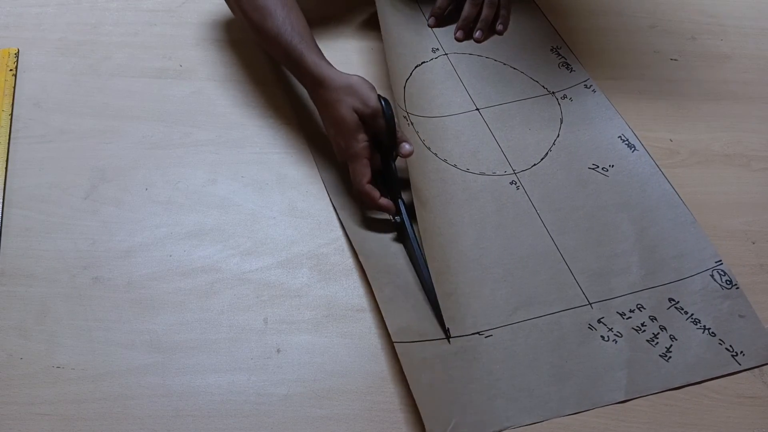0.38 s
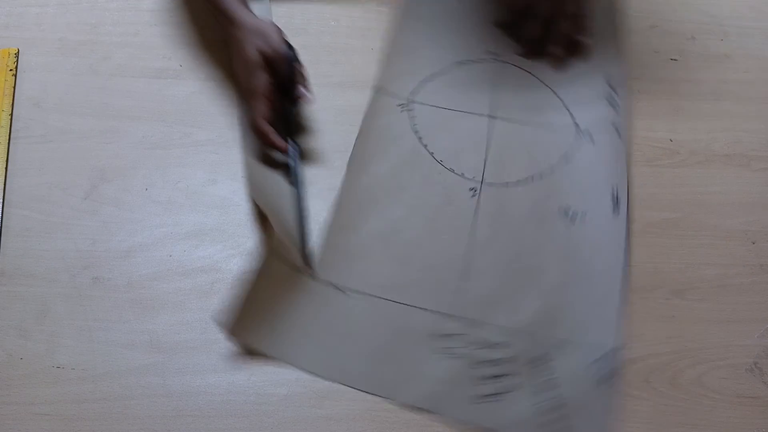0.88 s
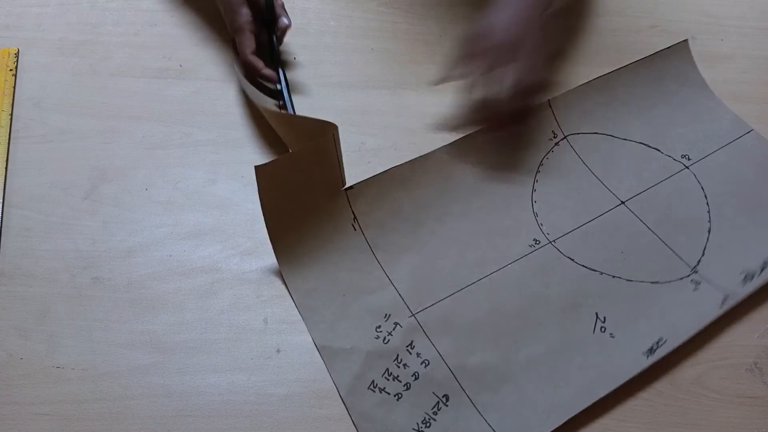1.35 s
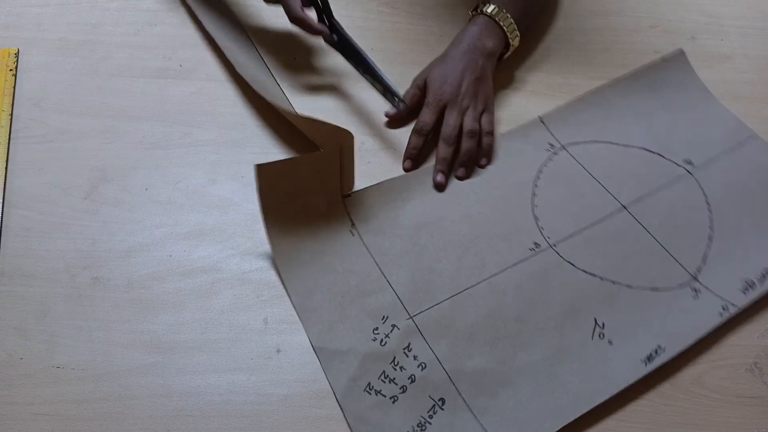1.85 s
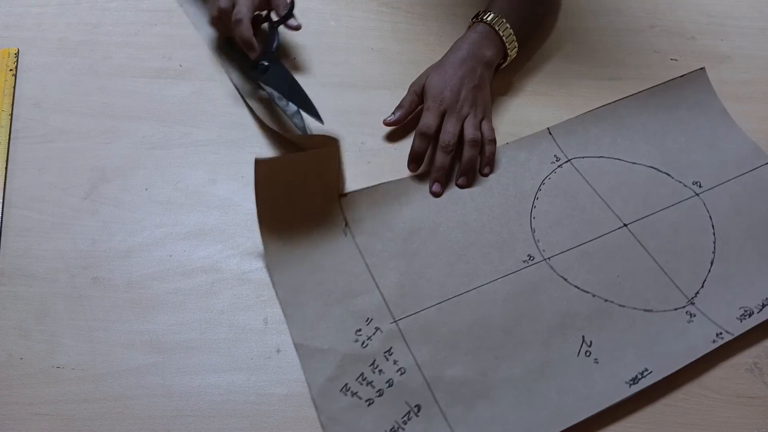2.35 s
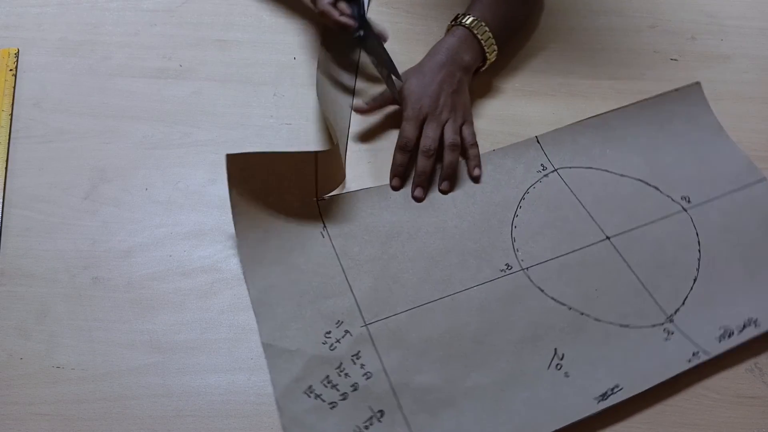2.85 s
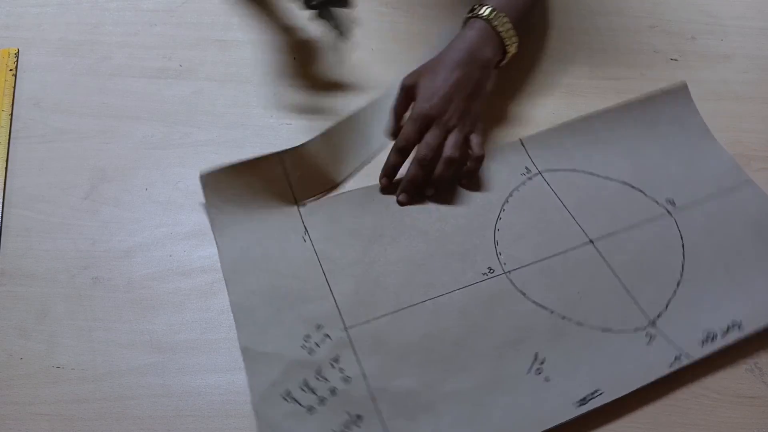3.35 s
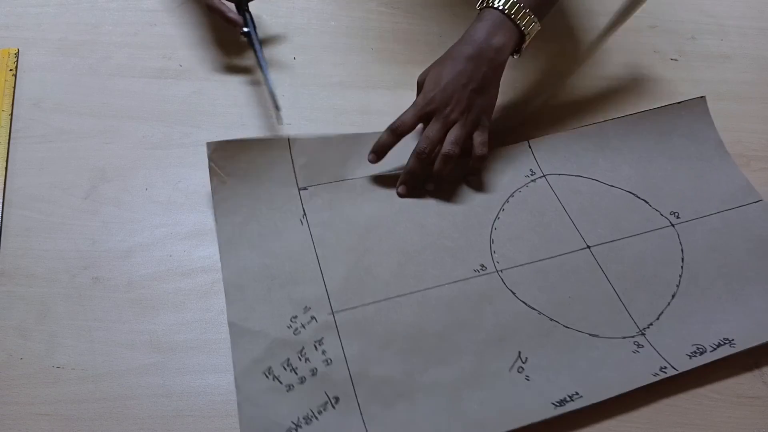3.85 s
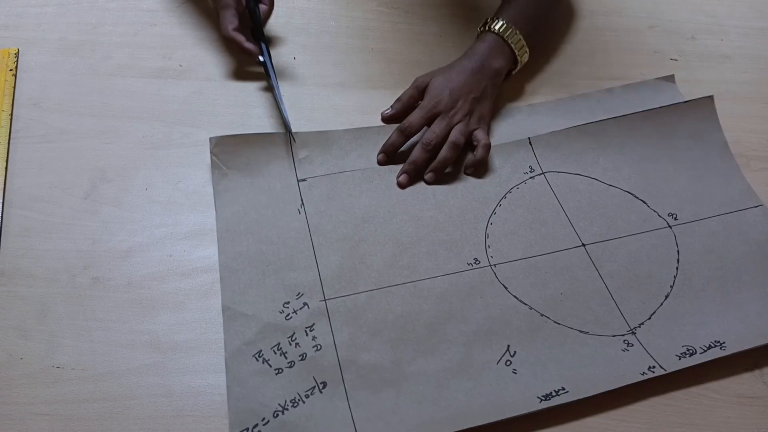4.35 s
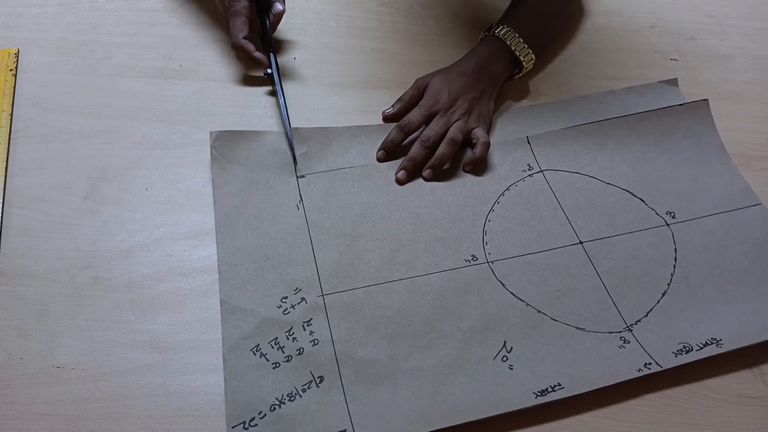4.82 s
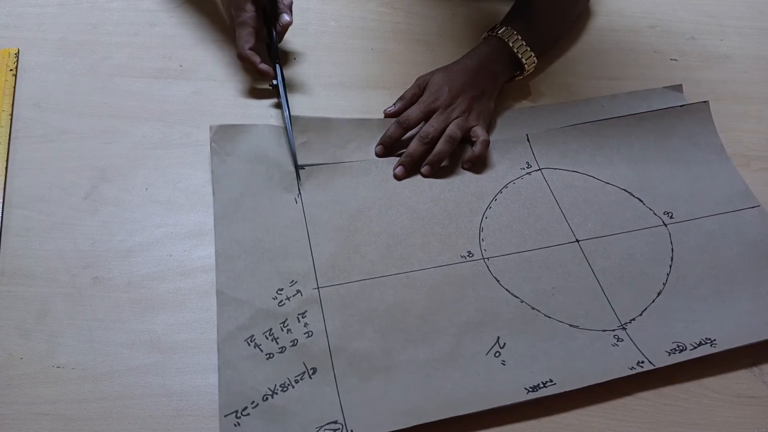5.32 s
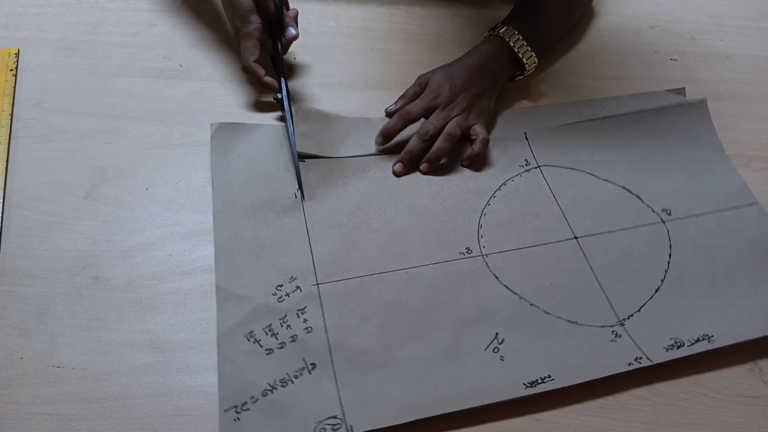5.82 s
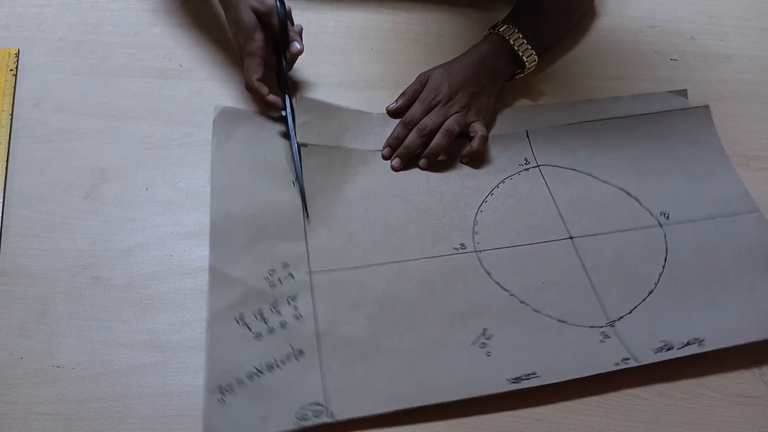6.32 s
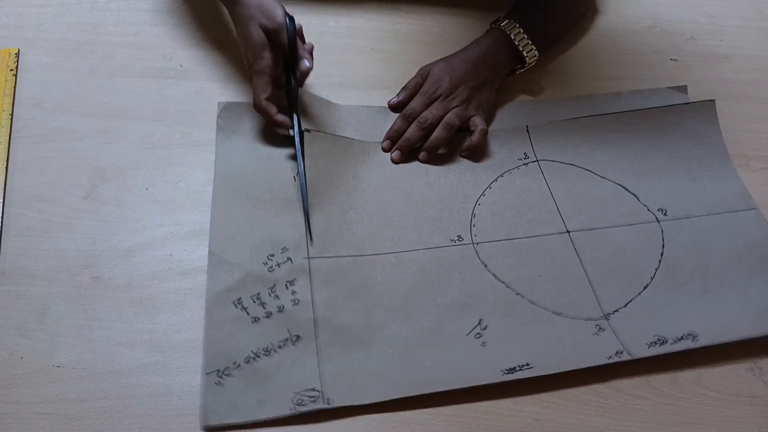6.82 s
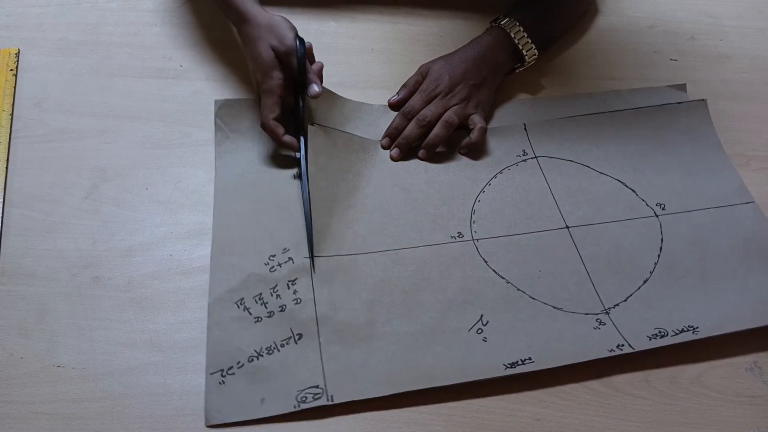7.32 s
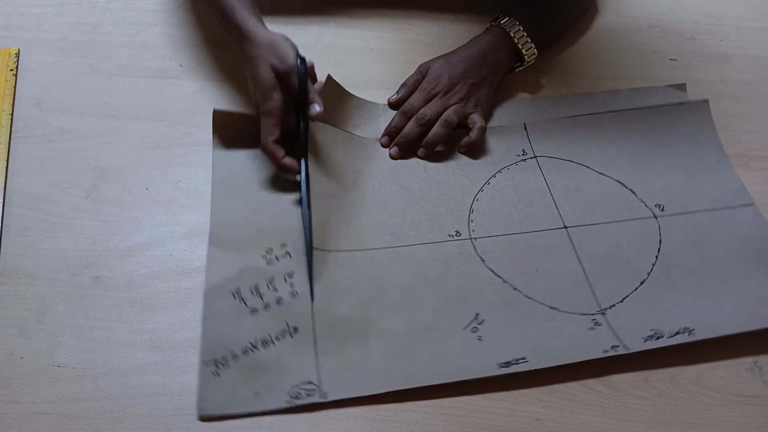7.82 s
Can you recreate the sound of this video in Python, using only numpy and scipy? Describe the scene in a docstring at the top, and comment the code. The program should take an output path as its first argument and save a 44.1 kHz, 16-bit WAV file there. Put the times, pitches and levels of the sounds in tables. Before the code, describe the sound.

Close scissor cuts in heavy paper on a wooden table, with steel snicks, a rising sheet scrape, faint rustling and a single loud knock.

```python
"""Long scissors crunch twice through a big sheet of stiff paper on a wooden table, close by in a small room.
Steel snicks, the sheet is dragged round with a climbing drone, then rustles; a hard knock with a quick bounce
hits the table, and eight more cuts follow. Shear, scraping and rustling are irregular fibre slips filtered by
resonances of blades, table and sheet; the knock is decaying table modes over a crack; faint air lies below."""
import sys
import numpy as np
from scipy import signal
from scipy.fft import rfft, irfft, next_fast_len
from scipy.io import wavfile
from scipy.ndimage import uniform_filter1d, map_coordinates

SR = 44100
rng = np.random.default_rng(int(sys.argv[2]) if len(sys.argv) > 2 else 0)


def materialize(psi):
    """Save the field psi as 16-bit PCM at rate SR to the path in sys.argv[1].

    A 1-D psi becomes a single channel; in a 2-D psi each row is a channel.
    """
    bounded = np.clip(np.atleast_2d(psi).T, -1, 1)
    quanta = np.round(bounded * 32767).astype(np.int16)
    wavfile.write(sys.argv[1], SR, quanta)


def invert_db(x):
    """Field ratio 10**(x/20) for x, a level in decibels (scalar or array-like)."""
    u = np.asarray(x, float) / 20
    return 10 ** u


N = 349660  # length in samples


def unit(x):
    """Normalization: scales a signal to rms 1."""
    return x / np.sqrt(np.mean(np.abs(x) ** 2) + 1e-20)


def along(points, hz):
    """Logarithmic frequency scale: interpolates (frequency, value) points."""
    point_hz, value = np.transpose(points)
    return np.interp(np.log(hz + 1), np.log(point_hz + 1), value)


def curves(rows):
    """Piecewise linear control: a gate open from first to last row, and a curve for each column after time."""
    start, *columns = np.transpose(rows)
    t = np.arange(N) / SR
    is_open = 1.0 * (t >= start[0]) * (t <= start[-1])
    return uniform_filter1d(is_open, size=400), [np.interp(t, start, column) for column in columns]


def filtered(x, response):
    """Linear filtering: multiplies the spectrum by a complex response of frequency."""
    size = next_fast_len(N + SR // 2)
    spectrum = rfft(x, size) * response(np.fft.rfftfreq(size, 1 / SR))
    return irfft(spectrum, size)[..., :x.shape[-1]]


def modes(table):
    """Modal superposition: cubed resonances, steep-sided with dark valleys between them."""
    def response(f):
        return sum(invert_db(db) * (2j * f * width / (centre ** 2 - f ** 2 + 2j * f * width)) ** 3
                   for centre, width, db in table)
    return response


def fibres(spiky_db, lump_db, lump_hz):
    """Stick-slip noise: dense tiny slips of very unequal size, arriving in lumps."""
    sizes = invert_db(spiky_db * rng.exponential(size=N))
    lumps = map_coordinates(rng.standard_normal(2000), [np.arange(N) * lump_hz / SR])
    return rng.standard_normal(N) * sizes * invert_db(lump_db * lumps)


def coloured(x, spectrum):
    """Spectral shaping: applies a gain curve, then scales to rms 1."""
    return unit(filtered(x, lambda hz: invert_db(along(spectrum, hz))))


def resonated(slips, table):
    """Forced vibration: slips drive a set of modes, scaled to rms 1."""
    return unit(filtered(slips, modes(table)))


def gliding(slips, table, hz, reach_hz):
    """Selective excitation: of the fixed modes, those nearest the pitch curve ring the most."""
    near = np.array([np.exp(-((hz - centre) / reach_hz) ** 2) + 1e-3 for centre, _, _ in table])
    rung = np.array([invert_db(db) * resonated(slips, [(centre, width, 0)]) for centre, width, db in table])
    return np.sum(near * rung, axis=0) / np.sqrt(np.sum(near ** 2, axis=0))


def patchy(x, depth_db):
    """Patchy noise: random gain in time-frequency patches."""
    z = signal.stft(x, nperseg=512)[2]
    patches = uniform_filter1d(rng.standard_normal(z.shape), size=2, axis=0)  # bins
    patches = uniform_filter1d(patches, size=14, axis=1)  # frames
    return signal.istft(z * invert_db(depth_db * unit(patches)), nperseg=512)[1][:N]


def swells(start, length, db, swell_db, rise_s, fall_db_per_s):
    """Energy envelope in dB: events rise, drift by swell_db over their length, then fall; powers add."""
    t, power = np.arange(N) / SR, np.full(N, 1e-12)
    for begin, lasts, level_db, drift_db in np.broadcast(start, length, db, swell_db):
        span = slice(round(begin * SR), round((begin + lasts) * SR) + SR // 2)
        age = t[span] - begin
        level = level_db + drift_db * np.clip(age / lasts, 0, 1)
        level = level - fall_db_per_s * np.clip(age - lasts, 0, None)
        power[span] += (invert_db(level) * np.clip(age / rise_s, 0, 1)) ** 2
    return 10 * np.log10(power)


def latest(start, values):
    """Sample and hold: the value of the event that began last."""
    return values[np.clip(np.searchsorted(start, np.arange(N) / SR) - 1, 0, None)]


def power_sum(a_db, b_db):
    """Incoherent addition: two levels in dB, added as powers."""
    return 10 * np.log10(invert_db(a_db) ** 2 + invert_db(b_db) ** 2)


# The blades close and cut: start_s, length_s, shear_db (before a small trim), table_hum_db, swell_db (over the length)
CLOSING_STROKES = [(0.018, 0.094, -36, -37, -4.5), (0.321, 0.053, -37, -36, -3),
                   (4.915, 0.14, -61.5, -44, 14), (5.434, 0.12, -52, -37, 3.5),
                   (5.867, 0.09, -52, -34, 4.5), (6.314, 0.055, -42.5, -34, 1),
                   (6.69, 0.091, -41, -34.5, 1.5), (7.084, 0.072, -39, -37, 1),
                   (7.442, .1, -39, -35.5, -3.5), (7.8, 0.086, -41.5, -35, -1.5)]
# Quieter scraping between and after the closings: reopening blades and fading stroke tails:
# start_s, length_s, shear_db (before the trim), table_hum_db, swell_db (hum sags more)
BETWEEN_STROKES = [(0, 0.03, -30, -32, -13), (0.136, 0.18, -49.5, -43.5, -4.5),
                   (0.394, 0.11, -43.5, -31, -20.5), (5.135, 0.22, -56, -39.5, -9),
                   (5.612, 0.15, -60, -45, 2.5), (5.777, 0.11, -74.5, -95, 4), (5.961, 0.2, -52, -37, -2.5),
                   (6.164, 0.14, -53, -44.5, -5.5), (6.448, 0.3, -46, -39, -16),
                   (6.839, .24, -51.5, -44.5, -1.7), (7.201, 0.32, -48.5, -44, -12),
                   (7.563, 0.15, -41, -38.5, -16.5), (7.71, 0.13, -61.5, -61.5, 23)]
# The cut edge flexes: start_s, length_s, level_db
EDGE_FLEXES = [(0.026, 0.15, -37.5), (0.195, 0.22, -44.5), (0.354, 0.089, -32.5), (4.995, 0.1, -59),
               (5.14, .1, -53), (5.512, 0.094, -47), (5.625, 0.097, -55), (5.984, 0.088, -52),
               (6.344, 0.052, -57), (6.44, 0.24, -53), (6.712, 0.11, -46), (6.803, 0.42, -52.5),
               (7.1, 0.11, -45), (7.434, 0.25, -44.5), (7.799, 0.09, -44.5)]
# The lowest table modes are jolted, by the blade or the dragged sheet: start_s, length_s, level_db
TABLE_JOLTS = [(0.031, 0.025, -38), (0.088, 0.12, -46), (0.345, 0.098, -43), (1.701, 0.033, -56),
               (4.975, 0.024, -41), (5.053, 0.18, -47), (5.522, 0.073, -43), (5.961, .14, -48.5),
               (6.38, 0.04, -44.5), (6.778, 0.018, -52), (7.162, 0.044, -52.5), (7.498, 0.058, -45.5),
               (7.857, .04, -61)]
# Spectrum of sheared fibres: frequency_hz, relative_db
SHEAR_SPECTRUM = [(440, -14), (750, -38.5), (820, 6), (991, 3), (1280, -10.5), (1620, 2), (2560, -1.5),
                  (4830, 0.5), (7620, -13.5), (11600, -11.5), (15500, -25)]
# Blade modes rung by the shear: frequency_hz, width_hz, relative_db
BLADE_MODES = [(775, 150, 2.5), (1165, 194, 3.5), (1277, 78, 8), (1360, 237, 4.5)]
# Table-top modes under blade or sheet: frequency_hz, width_hz, relative_db
TABLE_HUM_MODES = [(520, 23.6, 2.5), (594.5, 33.2, 3.5), (589.6, 74, -3)]
# Sheet modes: frequency_hz, width_hz, relative_db
FLAP_MODES = [(322, 49, -15), (410, 82, -3.5), (715, 99, -10.5)]
# Lowest table modes: frequency_hz, width_hz, relative_db
TABLE_BOOM_MODES = [(126.3, 31.4, 7.5), (175.7, 28, -3)]


def scissors():
    """Friction-driven resonance: fibres part, and the same rough contact shakes blades, table and sheet."""
    start, length, cut_db, ride_db, swell_db = np.transpose(CLOSING_STROKES)
    close_cut_db = swells(start, length, cut_db, swell_db, rise_s=0.0095, fall_db_per_s=229)
    lead_s = 0.0085  # the blade slides on the table just before it bites
    close_ride_db = swells(start - lead_s, length + lead_s, ride_db, swell_db, rise_s=0.024, fall_db_per_s=229)

    start, length, cut_db, ride_db, swell_db = np.transpose(BETWEEN_STROKES)
    between_cut_db = swells(start, length, cut_db, swell_db, rise_s=0.04, fall_db_per_s=592)
    # here the hum sags by a further 9 dB over each event
    between_ride_db = swells(start, length, ride_db, swell_db - 9, rise_s=0.04, fall_db_per_s=592)

    shear_db = power_sum(close_cut_db, between_cut_db)
    hum_db = power_sum(close_ride_db, between_ride_db)
    flap_db = swells(*np.transpose(EDGE_FLEXES), swell_db=-3.5, rise_s=0.025, fall_db_per_s=344)
    boom_db = swells(*np.transpose(TABLE_JOLTS), swell_db=0.5, rise_s=0.018, fall_db_per_s=504)
    # the blades ring when both the cut and the table contact are strong
    blade_db = 0.44 * shear_db + 0.86 * hum_db + 3.66

    slips = fibres(spiky_db=2.5, lump_db=0.5, lump_hz=71.6)
    shear = invert_db(shear_db + 0.75) * coloured(patchy(slips, depth_db=2.8), SHEAR_SPECTRUM)
    blades = invert_db(blade_db) * resonated(slips, BLADE_MODES)
    hum = invert_db(hum_db) * resonated(slips, TABLE_HUM_MODES)
    flap = invert_db(flap_db) * resonated(slips, FLAP_MODES)
    boom = invert_db(boom_db) * resonated(slips, TABLE_BOOM_MODES)
    return shear + blades + hum + flap + boom


# Blades meet at the pivot: start_s, level_db, rise_s (time constant), t60_s, tilt_db_per_octave (about 4400 Hz)
PIVOT_SNICKS = [(.172, -34, .0006, .035, -20), (.347, -31, .0006, .03, 3), (.572, -43, .0027, .12, 14),
                (.6265, -24, .0005, .042, -4), (.678, -40, .001, .02, -22)]
# Steel modes: frequency_hz, width_hz, relative_db (before the tilt)
STEEL_MODES = [(2480, 780, -28), (4200, 97, -1), (5120, 320, -8), (5800, 93, -5.5)]


def snicks():
    """Impact excitation of steel: noise through blade modes rattles briefly and decays exponentially."""
    out, t = np.zeros(N + SR), np.arange(SR // 4) / SR
    for start, db, rise, t60, tilt in PIVOT_SNICKS:
        steel = modes([(hz, width, level + tilt * np.log2(hz / 4400)) for hz, width, level in STEEL_MODES])
        noise = rng.standard_normal(len(t))
        # a weak broadband floor lies between the modes
        rattle = unit(filtered(noise, lambda f: steel(f) + 0.056 / (1 + (f / 8000) ** 2)))
        envelope = invert_db(db - 60 * t / t60) * (1 - np.exp(-t / rise))
        out[round(start * SR):][:len(t)] += envelope * rattle
    return out[:N]


# Blow and bounce: start_s, level_db (before the mix of ring and crack)
KNOCK_BLOWS = [(4.292, -10.5), (4.319, -23)]
# Modes of the struck table: frequency_hz, relative_db (before random scatter), t60_s
STRUCK_TABLE_MODES = [(121.6, 2, 0.47), (189, 3, 0.42), (303.5, -1.5, 0.33), (358, -5.5, 0.45),
                      (494, -12, .4), (644, -1.5, 0.079), (813, -1.5, .2), (1131, -10, 0.42),
                      (1272, -6, 0.43), (1410, -7.5, 0.35), (1626, -13.5, 0.4), (1740, -13.5, 0.35),
                      (1820, -8.5, .36), (1993, -15.5, 0.16), (2280, -26.5, .4), (2760, -11.5, .3)]
# Spectrum of the crack: frequency_hz, relative_db
CRACK_SPECTRUM = [(80, -39.5), (126, 6.5), (300, -14), (640, -1), (960, -21.5), (1450, -3.5), (2700, -25),
                  (6000, -28.5), (8300, -53), (11500, -31), (15500, -66.5)]
# Decay of the room: frequency_hz, t60_s
ROOM_DECAY = [(100, 0.37), (500, 0.43), (900, 0.18), (1500, 0.46), (4000, 0.33), (12000, 0.5)]


def knock():
    """Modal decay under impact: the table's modes ring over a crack that dies band by band in the room."""
    out, t = np.zeros(N + SR), np.arange(SR) / SR
    mode_width_hz = 13

    def wander():
        """Phase diffusion: a random walk broadens each mode, as close modes beating do."""
        return np.cumsum(rng.standard_normal(SR)) * np.sqrt(2 * np.pi * mode_width_hz / SR)

    for start, db in KNOCK_BLOWS:
        ring = sum(invert_db(level + rng.normal(0, 0.88) - 60 * t / t60) * np.sin(2 * np.pi * hz * t + wander())
                   for hz, level, t60 in STRUCK_TABLE_MODES)
        hz, frame_s, z = signal.stft(rng.standard_normal(SR), SR, nperseg=1024)
        shape_db = along(CRACK_SPECTRUM, hz)[:, None] - 60 * frame_s / along(ROOM_DECAY, hz)[:, None]
        shape_db = shape_db + rng.normal(0, 4, (len(hz), 1))  # dense uneven modes
        tail = signal.istft(z * invert_db(shape_db), SR, nperseg=1024)[1][:SR]
        tail = tail / np.std(tail[:900])
        # the room tail, with an extra burst that dies within milliseconds
        crack = tail * (invert_db(-9.5) + invert_db(-4.0 - 60 * t / 0.025))
        onset = 1 - np.exp(-t / 0.0036)
        out[round(start * SR):][:SR] += invert_db(db) * (invert_db(-12.0) * ring + crack) * onset
    return out[:N]


# The sheet is dragged round: time_s, scrape_db (before a trim), table_hum_db, sheet_drone_db (before mode weighting)
DRAG_LEVELS = [(0.57, -79, -69, -78), (0.622, -46, -40.5, -32.5), (0.72, -53.5, -54.5, -40),
               (0.9, -46, -40.5, -40), (1.19, -41, -41, -39), (1.506, -58.5, -39, -47.5),
               (1.654, -71.5, -58, -81), (1.716, -62.5, -50, -60), (1.826, -84.5, -85, -88)]
# Climb of the drone: time_s, pitch_hz
DRONE_PITCH = [(.9, 209), (1.5, 395)]
# Spectrum of the scrape: frequency_hz, relative_db
SCRAPE_SPECTRUM = [(410, -61), (700, 4), (1070, -3), (1120, -7), (1650, -2), (1920, -5.5), (5290, -5.5),
                   (8210, -19), (11100, -11.5), (15500, -23.5)]
# Table top under the sliding sheet: frequency_hz, width_hz, relative_db
OVERTONE_MODE = [(1140, 50, 0)]
# Modes of the sheet on the table: frequency_hz, width_hz, relative_db
DRONE_MODES = [(201, 45.6, 5.5), (289, 55, 3.5), (370.7, 48, 3.5)]


def drag():
    """Sliding friction: the sheet scrapes over wood; its drone climbs mode by mode as less hangs free."""
    gate, (scrape_db, hum_db, drone_db) = curves(DRAG_LEVELS)
    _, (drone_hz,) = curves(DRONE_PITCH)
    # the boom dies once the drone has climbed above 272 Hz, at 0.4 dB per Hz
    boom_db = drone_db - 1.5 - 0.4 * np.clip(drone_hz - 272, 0, None)
    slips = fibres(spiky_db=1.5, lump_db=1.0, lump_hz=59.57)
    scrape = invert_db(scrape_db + 3.5) * coloured(slips, SCRAPE_SPECTRUM)
    hum = invert_db(hum_db) * resonated(slips, TABLE_HUM_MODES)
    overtone = invert_db(hum_db - 22) * resonated(slips, OVERTONE_MODE)
    boom = invert_db(boom_db) * resonated(slips, TABLE_BOOM_MODES)
    drone = invert_db(drone_db) * gliding(slips, DRONE_MODES, drone_hz, reach_hz=89.3)
    return gate * (scrape + hum + overtone + boom + drone)


# The loose flap rustles: start_s, length_s, rustle_db, high_hiss_db, crinkle (0 even rasp to 1 patchy, clipped)
FLAP_RUSTLES = [(1.772, 0.12, -68, -76, 0.59), (1.886, 0.12, -63.5, -69, .95),
                (2.033, 0.13, -65.5, -67, .95), (2.286, 0.22, -75.5, -72, 0.38),
                (2.512, 0.039, -55, -63, 0.97), (2.581, 0.17, -63, -72, 0.77),
                (2.708, 0.18, -53, -62, 0.056), (2.893, .065, -70.5, -86, .1),
                (3.003, 0.11, -81.5, -82, .5), (3.117, 0.12, -70, -71, 1.2), (3.249, 0.014, -55, -60, 0.42),
                (3.305, 0.37, -70.5, -79.5, 0.25), (3.614, 0.057, -65.5, -84.5, 0.079),
                (3.78, 0.05, -58, -62.5, 1.17), (3.877, 0.15, -66.5, -75, 0.65), (4.065, 0.3, -81, -82, .8),
                (4.56, 0.032, -62.5, -67, 0.29), (4.656, 0.038, -88, -65.5, 0.68),
                (4.835, 0.025, -95, -68.5, 0.64)]
# The stiff flap rings as it scrapes: start_s, length_s, level_db (before mode weighting), pitch_hz
FLAP_RINGS = [(1.787, 0.02, -58.5, 520), (2.717, 0.19, -55, 673), (2.843, 0.041, -43, 610),
              (2.906, 0.045, -62, 520), (3.27, .01, -73, 680), (3.609, 0.036, -62, 835),
              (3.894, 0.037, -81, 800), (4.09, 0.0064, -61, 626), (4.702, 0.13, -74.5, 510)]
# Spectrum of rustling paper: frequency_hz, relative_db
RUSTLE_SPECTRUM = [(590, -42), (1000, -8.5), (1380, -6.5), (1480, -5.5), (4490, -4), (6120, -4.5),
                   (8340, -24.5), (11500, -12), (15500, -33.5)]
# Modes of the stiff flap: frequency_hz, width_hz, relative_db
RING_MODES = [(511.4, 37, 0.5), (608, 36, -1.5), (809, 59, 10.5)]


def handling():
    """Crumpling and sliding noise: patchy crinkle or even rasp, a high hiss, and the stiff flap's resonance."""
    start, length, body_db, top_db, crinkle = np.transpose(FLAP_RUSTLES)
    evenness = 1 - np.clip(latest(start, crinkle), 0, 1)
    rustle_db = swells(start, length, body_db, swell_db=-1.5, rise_s=0.023, fall_db_per_s=351)
    hiss_db = swells(start, length, top_db, swell_db=-1.5, rise_s=0.023, fall_db_per_s=351)
    start, length, db, hz = np.transpose(FLAP_RINGS)
    ring_db = swells(start, length, db, swell_db=-1.5, rise_s=0.0021, fall_db_per_s=398.5)
    ring_hz = latest(start, hz)

    slips = fibres(spiky_db=2.5, lump_db=0.8, lump_hz=40.7)
    crinkled = patchy(fibres(spiky_db=2.5, lump_db=1.2, lump_hz=40), depth_db=6.5)
    # the patchy rustle is thin and bright, without low tones
    crinkled = filtered(crinkled, lambda hz: 1 / (1 + (2300 / (hz + 1)) ** 4))
    paper = np.sqrt(evenness) * unit(slips) + np.sqrt(1 - evenness) * unit(crinkled)
    body = filtered(paper, lambda hz: invert_db(along(RUSTLE_SPECTRUM, hz)) * (hz < 7500))
    top = filtered(paper, lambda hz: invert_db(along(RUSTLE_SPECTRUM, hz)) * (hz >= 7500))
    ring = invert_db(ring_db) * gliding(slips, RING_MODES, ring_hz, reach_hz=109.4)
    return invert_db(rustle_db) * unit(body) + invert_db(hiss_db) * unit(top) + ring


# Creases snap: start_s, level_db (before a fixed trim), t60_s
CREASE_TICKS = [(2.602, -51.5, 0.35), (2.961, -48, .04), (3.262, -45, 0.071), (3.614, -44.5, 0.12),
                (3.889, -50.5, 0.11), (4.568, -37.5, 0.28)]


def creases():
    """Sudden buckling: each crease releases a bright burst of paper noise that decays exponentially."""
    out, t = np.zeros(N + SR), np.arange(SR // 4) / SR
    paper = coloured(rng.standard_normal(N), RUSTLE_SPECTRUM)
    for start, db, t60 in CREASE_TICKS:
        burst = paper[round(start * SR):][:len(t)]
        out[round(start * SR):][:len(t)] += invert_db(db - 10.5 - 60 * t / t60) * burst
    return out[:N]


# Palm on the table: start_s, level_db (before onset and mode levels), t60_s
PALM_THUDS = [(3.925, -29.5, 0.087), (3.968, -36, 0.072)]


def palm():
    """Soft impact: a slow onset pushes the lowest table modes, which decay as sines."""
    out, t = np.zeros(N + SR), np.arange(SR // 4) / SR
    push = sum(invert_db(level) * np.sin(2 * np.pi * hz * t) for hz, _, level in TABLE_BOOM_MODES)
    for start, db, t60 in PALM_THUDS:
        envelope = invert_db(db - 60 * t / t60) * (1 - np.exp(-t / 0.021))
        out[round(start * SR):][:len(t)] += envelope * push
    return out[:N]


# Spectrum of the room's air: frequency_hz, relative_db
AIR_SPECTRUM = [(18, -51), (30, 8.5), (48, 18), (108, 11), (315, -6), (479, -2.5), (1440, -16.5),
                (4660, -17), (8720, -28.5), (11300, -16), (15500, -39)]


def room_air():
    """Stationary background noise: slightly lumpy noise shaped to a low-heavy spectrum."""
    return invert_db(-67.5) * coloured(fibres(spiky_db=2.5, lump_db=1.5, lump_hz=14), AIR_SPECTRUM)


def scene():
    """Linear superposition: all sources over the quiet air of the room, in one channel."""
    paper_and_steel = scissors() + snicks() + drag() + handling() + creases()
    return (paper_and_steel + knock() + palm() + room_air())[None]


def top_cut(x):
    """Nothing passes above the cut-off."""
    return signal.sosfilt(signal.butter(12, 16150, fs=SR, output="sos"), x)


def record(dry):
    """Band-limited transduction: the microphone drops the deep bass and the extreme top."""
    low_hz, top_hz = 96, 15550
    heard = filtered(dry, lambda hz: (1j * hz / (low_hz + 1j * hz)) ** 3 * (hz < top_hz))
    return top_cut(heard)


dry = scene()
out = record(dry)
materialize(out)
```